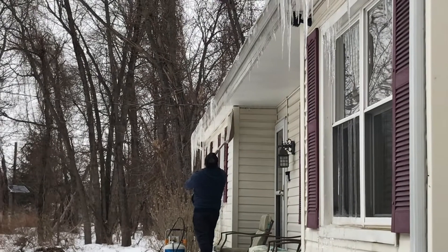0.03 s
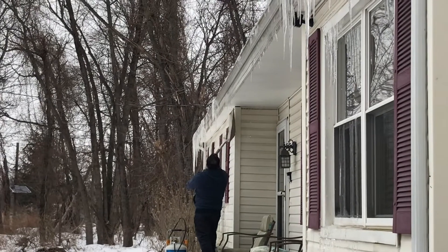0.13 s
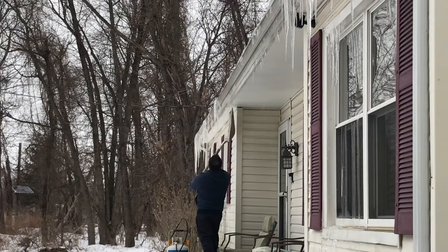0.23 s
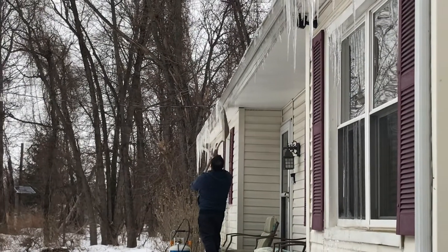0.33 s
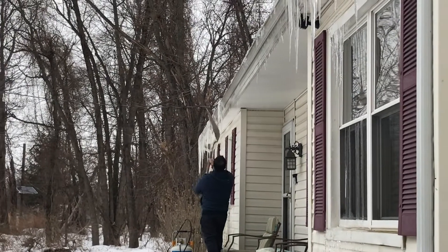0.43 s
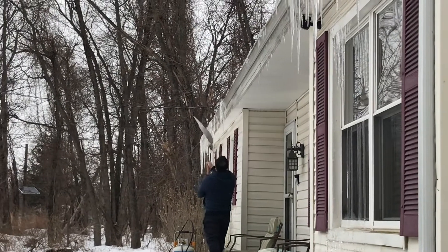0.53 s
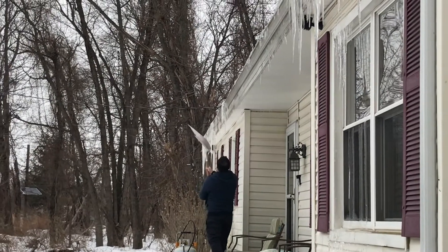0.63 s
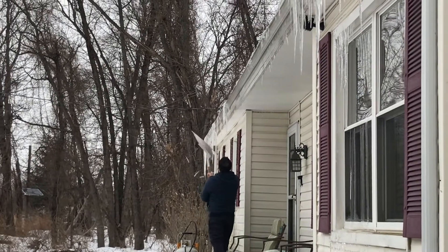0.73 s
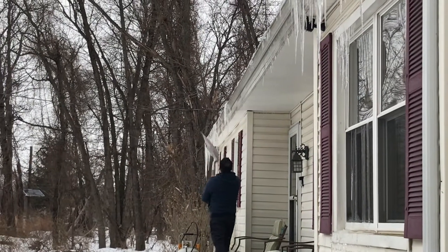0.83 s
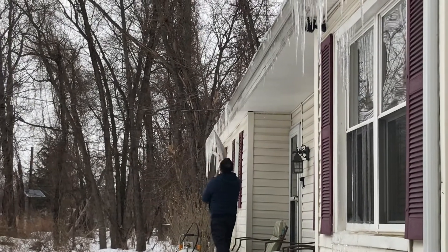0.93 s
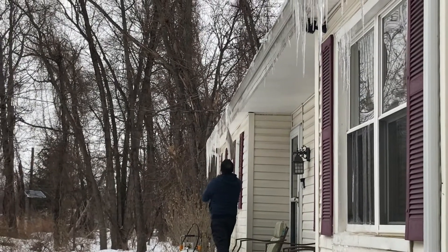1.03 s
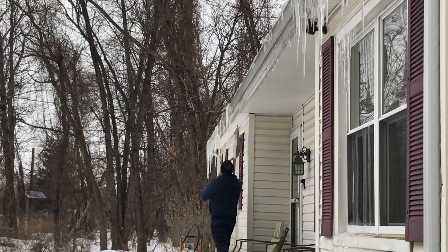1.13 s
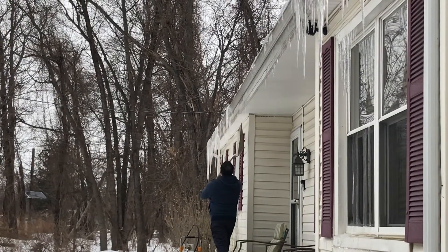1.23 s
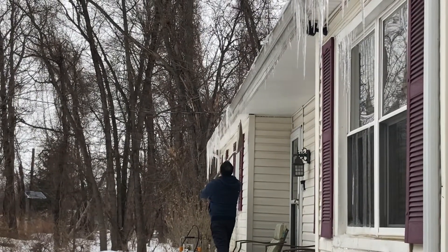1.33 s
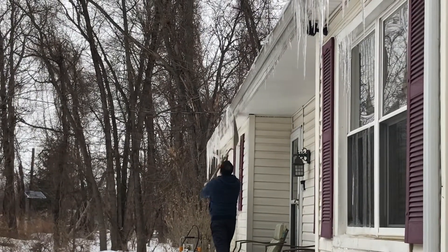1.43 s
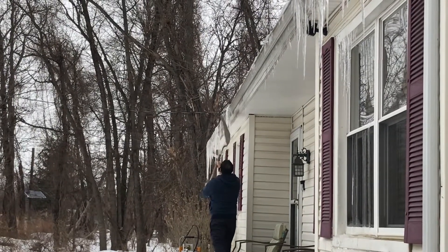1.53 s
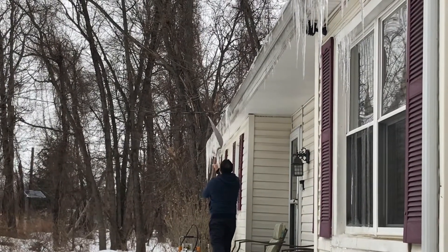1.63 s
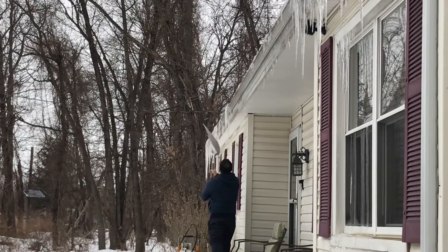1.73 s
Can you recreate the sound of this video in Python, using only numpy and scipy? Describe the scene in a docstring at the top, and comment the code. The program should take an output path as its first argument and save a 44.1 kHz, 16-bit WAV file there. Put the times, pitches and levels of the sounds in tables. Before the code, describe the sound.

A steel shovel strikes icicles with a loud, sharp clang; ice fragments crack and tick on paving, then a second, duller hit with a quick rebound. Outdoors by a house wall, faint traffic hum and low wind rumble.

```python
"""A steel shovel blade hits icicles at a roof edge twice, rebounds once, and rings as a set of fading sines.
Broken ice cracks on the paving (short noise bursts with a snap); single short tones add knocks, thuds and tinkles.
The house wall answers the cracks and short tones with scattered echoes, made by filtering with fading noise.
Behind it all lie a far traffic hum with hiss and a low wind rumble, both made of filtered noise."""
import sys
import numpy as np
from scipy import signal
from scipy.fft import rfft, irfft, next_fast_len
from scipy.io import wavfile
from scipy.ndimage import uniform_filter1d

SR = 44100
rng = np.random.default_rng(int(sys.argv[2]) if len(sys.argv) > 2 else 0)


def bounce(signal):
    """Save signal as a 16-bit WAV file at the path given by the first command-line argument."""
    frames = np.transpose(np.atleast_2d(signal))
    limited = np.clip(frames, -1, 1)
    pcm = np.round(limited * 32767).astype(np.int16)
    wavfile.write(sys.argv[1], SR, pcm)


N = 77175  # length in samples: 1.75 s

# Modes of the blade, the pitches at which the steel rings: f/Hz
BLADE_MODES_HZ = [643, 797, 871, 937, 1040, 1092, 1296, 1416, 1626, 1827, 1868, 2002, 2410, 2550, 2734,
                  2869, 3184]
# How each of those modes rings: first blow level/dB, second blow level/dB, rebound level/dB,
# build-up time constant/ms, full t60/s (time to fade by 60 dB, before RING_SHARES shortens it)
BLADE_RINGING = [(-50, -60, -64, 7, 0.54), (-48.5, -68, -73, 4.3, 0.51), (-52, -44.5, -74, 8.3, 0.65),
                 (-49.5, -66, -69, 9.4, 0.74), (-34.5, -61, -69, 4.3, 0.22), (-37, -43.5, -59, 54, 0.98),
                 (-39, -41, -48, 2.6, 0.26), (-36.5, -41.5, -46.5, 3.5, .26), (-36, -54, -47, 3.5, 0.22),
                 (-26.5, -58, -71, 10.5, 0.29), (-51.5, -36.5, -67, 6.6, 0.52),
                 (-40, -48, -49.5, 4.5, 0.29), (-42, -45, -45.5, 3.5, 0.35), (-24, -30, -34.5, 1.1, 0.16),
                 (-40.5, -49, -40.5, 8.1, 0.22), (-37, -60, -36.5, 3.2, 0.12),
                 (-32.5, -35.5, -45, 1.8, 0.15)]
# Moments of the first blow, the second blow and the rebound: t/s
BLOW_TIMES_S = [.217, 1.4045, 1.454]
# Share of each mode's full t60 left after each blow (no unit); ice on the blade dulls the later ones
RING_SHARES = [0.97, 0.53, 0.64]
# Ice cracking or landing: t/s, level/dB before the bass cut, centre f/Hz,
# band half-width/octaves (out to 1/e of the peak), t60/s
ICE_CRACKS = [(.0, -63, 10900, 4.3, 0.33), (.214, -27, 2110, 1.4, 0.067), (.2226, -26, 2390, 1.26, 0.16),
              (.224, -26.5, 1170, 1.07, 0.14), (0.2197, -35.5, 6960, 1.2, 0.05),
              (0.243, -30.5, 6030, 0.89, 0.071), (0.4517, -52.5, 5550, 3.1, 0.045),
              (.594, -44.5, 6760, 1.2, 0.079), (.596, -48.5, 3080, 0.63, 0.11),
              (0.687, -40.5, 2580, 0.53, 0.0065), (0.8873, -43.5, 8040, 4.9, 0.011),
              (0.9145, -59, 5970, 2.9, 0.03), (0.951, -52, 6000, 3.5, 0.025),
              (0.958, -47, 9400, 0.41, 0.014), (0.963, -42, 5700, 9, 0.071),
              (1.0182, -26.5, 4800, 1.96, 0.016), (1.0185, -40, 2370, 0.39, 0.036),
              (1.019, -50, 8000, 1.3, 0.13), (1.112, -51.5, 3000, 1.4, 0.038),
              (1.119, -37.5, 1520, 1.38, 0.068), (1.124, -46, 1090, 0.51, 0.091),
              (1.124, -47.5, 7160, 1.05, 0.047), (1.228, -56.5, 7100, 4.4, 0.097),
              (1.258, -39.5, 8000, 5.1, 0.087), (1.3204, -39.5, 1930, 0.62, 0.037),
              (1.4052, -26, 4440, 1.26, 0.096), (1.4134, -33, 2740, 0.57, 0.18),
              (1.407, -37.5, 1570, 1.05, 0.27), (1.422, -40.5, 3070, 0.85, 0.088),
              (1.453, -35, 4900, 1.06, 0.072), (1.505, -58.5, 7000, 1.8, 0.1),
              (1.5765, -50, 2850, 0.54, 0.076), (1.743, -49.5, 4440, 0.97, 0.053)]
# Single-note knocks, thuds and tinkles of the blows and the ice:
# t/s, level/dB before the bass cut, pitch f/Hz, t60/s
SHORT_TONES = [(.2148, -19, 2504, 0.023), (.221, -16, 2560, 0.076), (0.2256, -12, 2518, 0.04),
               (.2305, -27, 2640, 0.02), (0.595, -53, 2643, 0.17), (0.598, -52, 2831, 0.14),
               (.6, -55, 3294, 0.25), (0.598, -52.5, 3972, 0.12), (0.6886, -35, 1760, 0.012),
               (0.6862, -39, 2270, 0.011), (1.32, -45.5, 2925, 0.03), (0.964, -29, 3930, 0.0071),
               (1.119, -36.5, 522, 0.03), (1.12, -34.5, 1405, 0.028), (1.322, -40, 1384, 0.054),
               (1.407, -33, 4500, 0.033), (1.004, -51, 11000, .02), (1.069, -60, 3730, .1),
               (1.161, -55, 10900, 0.031), (1.178, -53, 10900, 0.036), (1.656, -53.5, 2580, .05),
               (1.232, -59, 12800, 0.1), (0.22, -36.5, 179, 0.11), (1.0185, -30, 3580, 0.017)]
# How long the wall's echoes last: f/Hz, t60/s
WALL_FADING = [(300, 1), (1000, 0.83), (3000, 0.48), (8000, 0.29), (15000, 0.29)]
# Colour of the traffic hum and hiss: f/Hz, relative level/dB per Hz (HUM_DB sets the loudness)
HUM_COLOUR = [(15, -13), (25, -11), (60, -6), (236, -4.5), (317, -8.5), (500, -14), (677, -8.5),
              (950, -4.5), (1330, -7.5), (1610, -8), (3430, -23), (4740, -34), (5880, -34), (14000, -37.5),
              (16000, -41)]
# Wind on the microphone: t/s, level/dB before RUMBLE_LIFT_DB is added
WIND_RUMBLE = [(0, -64.5), (.9, -66), (1.02, -57.5), (1.3, -63), (1.45, -61.5), (1.75, -59.5)]

HASTEN = 1.382  # the ring holds, then dies ever faster as the blade swings away (1 = even decay)
TOUCH_HZ, TOUCH_S = 1700, 0.0091  # the next contact stifles modes above this, with this time constant
RISE_S = 0.00066  # time constant of the build-up of cracks and short tones
SNAP_DB = 8.5  # snap level over the crack's own level
CRUNCH_DB = 3.2  # typical swing in loudness of the grit
BASS_CUT_HZ = 300  # cracks and short tones are thinned below this
WALL_DB, WALL_DELAY_S = -14, 0.0072
TONE_ECHO_DB = -8  # the short tones reach the wall weakly
HUM_DB = -55
RUMBLE_HZ, RUMBLE_LIFT_DB = 56.5, 2
TOP_HZ = 15900  # upper limit of the microphone


def blade():
    """Each blow rings all the modes of the steel, and its touch stifles the high ones of the blow before."""
    out = np.zeros(N)
    free_times_s = np.diff(BLOW_TIMES_S, append=np.inf)  # time until the next contact
    for hz, (*levels_db, rise_ms, t60) in zip(BLADE_MODES_HZ, BLADE_RINGING):
        for start_s, level_db, share, free_s in zip(BLOW_TIMES_S, levels_db, RING_SHARES, free_times_s):
            t, shape = fade(rise_ms / 1000, t60 * share, HASTEN)
            tone = np.sin(2 * np.pi * (hz * t + rng.random()))  # starts anywhere in its cycle
            if hz > TOUCH_HZ:
                shape = shape * np.exp(-np.maximum(t - free_s, 0) / TOUCH_S)
            add(out, start_s, amp(level_db) * shape * tone)
    return out


def ice_cracks():
    """Breaking ice gives a gritty burst of noise in a band, plus a short sine snap: wider band, shorter snap."""
    out = np.zeros(N)
    for start_s, level_db, hz, octaves, t60 in ICE_CRACKS:
        t, shape = fade(RISE_S, t60)
        sand, noise = rng.standard_normal((2, len(t)))
        # smoothed noise makes the loudness flutter, like grains crunching
        grit = amp(CRUNCH_DB * unit(uniform_filter1d(sand, size=24)))
        burst = shape * unit(grit * filtered(noise, bell(hz, octaves)))
        turn = 2 * np.pi * hz * t
        snap = amp(SNAP_DB) * np.sin(turn) * np.exp(-turn * octaves / 2.84)
        add(out, start_s, amp(level_db) * (burst + snap))
    return out


def short_tones():
    """Knocks, thuds and tinkles of the blows and the ice: each a short tone that rises quickly and fades."""
    out = np.zeros(N)
    for start_s, level_db, hz, t60 in SHORT_TONES:
        t, shape = fade(RISE_S, t60)
        add(out, start_s, amp(level_db) * shape * np.sin(2 * np.pi * hz * t))
    return out


def wall(x):
    """Scattered echoes of house and yard: a late noise tail in which each frequency dies at its own speed."""
    hz, t, spectrum = signal.stft(rng.standard_normal(SR // 2), SR, nperseg=256)
    t60 = along(WALL_FADING, hz)[:, None]
    tail = signal.istft(spectrum * amp(-60 * t / t60), SR, nperseg=256)[1]
    tail = tail / np.linalg.norm(tail)
    delayed = np.pad(x, (round(WALL_DELAY_S * SR), 0))
    return signal.fftconvolve(delayed, tail)[:N]


def traffic_hum():
    """Far traffic and hiss blend into steady noise, coloured by a table of levels."""
    noise = rng.standard_normal(N)
    return amp(HUM_DB) * unit(filtered(noise, lambda hz: amp(along(HUM_COLOUR, hz))))


def wind_rumble():
    """Wind on the microphone makes low noise whose level drifts."""
    low = unit(filtered(rng.standard_normal(N), bell(RUMBLE_HZ, octaves=0.9)))
    times_s, levels_db = np.transpose(WIND_RUMBLE)
    level_db = np.interp(np.arange(N) / SR, times_s, levels_db) + RUMBLE_LIFT_DB
    return amp(level_db) * low


def thin(hz):
    """Response of a bass cut: two gentle high-pass steps in a row."""
    return (1j * hz / (BASS_CUT_HZ + 1j * hz)) ** 2


def amp(db):
    """Turn decibels into a plain multiplier."""
    return 10 ** (np.asarray(db) / 20)


def unit(x):
    """Scale a sound to an average (RMS) strength of 1."""
    return x / np.sqrt(np.mean(x ** 2) + 1e-20)


def along(points, hz):
    """Read between (f/Hz, value) points on a log frequency axis."""
    f, values = np.transpose(points)
    return np.interp(np.log(hz + 1), np.log(f + 1), values)


def filtered(x, response):
    """Change the strength of each frequency in x by a response."""
    size = next_fast_len(len(x) + 2048)  # spare room lessens wrap-around
    hz = np.fft.rfftfreq(size, 1 / SR)
    return irfft(rfft(x, size) * response(hz), size)[:len(x)]


def bell(centre_hz, octaves):
    """A bell-shaped band on a log axis, down to 1/e at this many octaves from the centre."""
    return lambda hz: np.exp(-(np.log2((hz + 1) / centre_hz) / octaves) ** 2)


def fade(rise_s, t60, hasten=1):
    """Times, and a loudness curve that builds up and then falls by 60 dB in t60 seconds."""
    t = np.arange(min(int(1.5 * t60 * SR) + 64, N)) / SR
    build_up = 1 - np.exp(-t / rise_s)
    return t, build_up * amp(-60 * (t / t60) ** hasten)


def add(out, start_s, sound):
    """Mix a sound in from its start time, cutting off what runs past the end."""
    part = out[round(start_s * SR):][:len(sound)]
    part += sound[:len(part)]


def scene():
    """The blade, the cracks, the short tones, the wall's echo of these two, and the background, summed."""
    cracks = filtered(ice_cracks(), thin)
    tones = filtered(short_tones(), thin)
    echo = amp(WALL_DB) * wall(cracks + amp(TONE_ECHO_DB) * tones)
    background = traffic_hum() + wind_rumble()
    return (blade() + cracks + tones + echo + background)[None]


def record(dry):
    """The microphone keeps nothing above its band limit."""
    return filtered(dry[0], lambda hz: hz < TOP_HZ)[None]


dry = scene()
out = record(dry)
bounce(out)
```